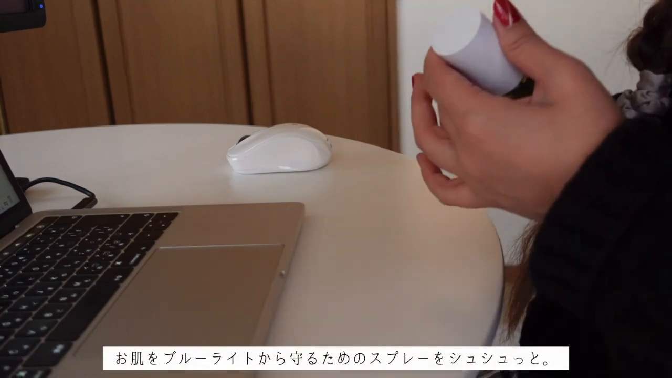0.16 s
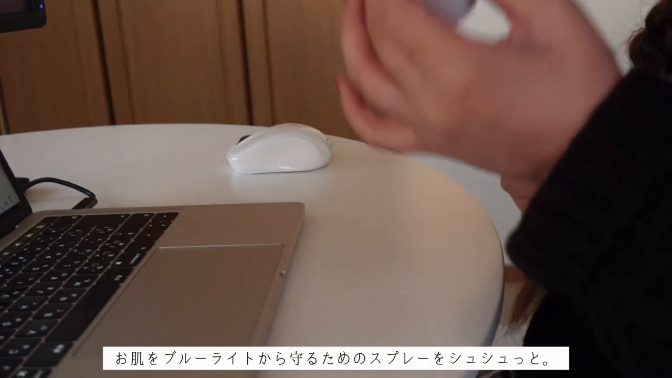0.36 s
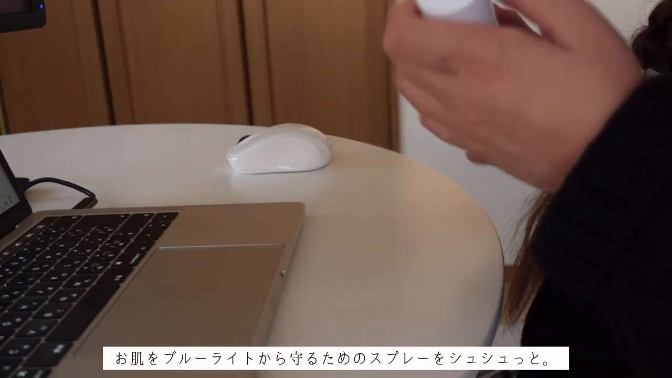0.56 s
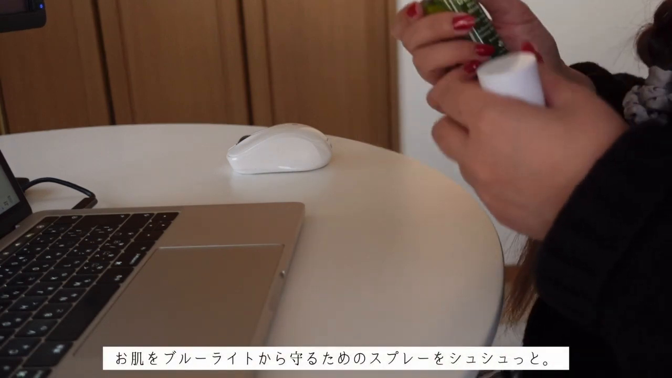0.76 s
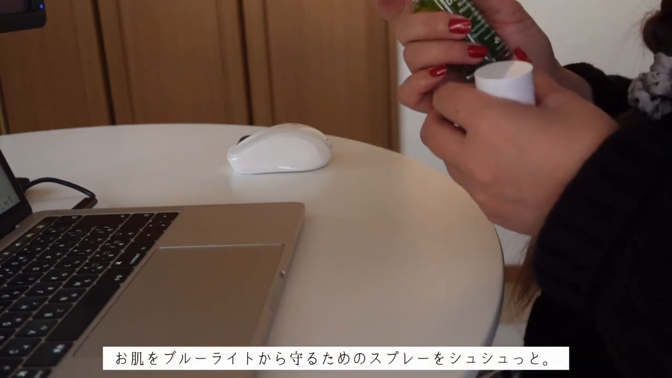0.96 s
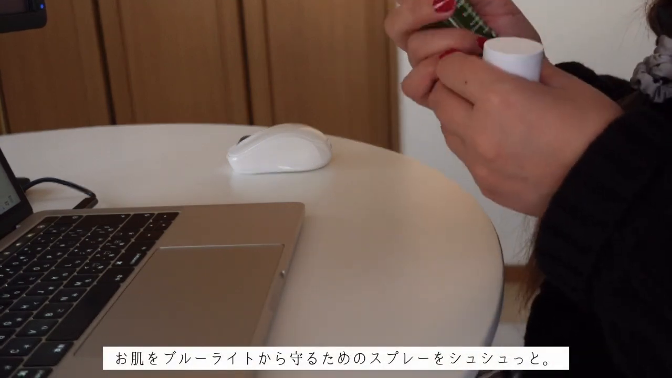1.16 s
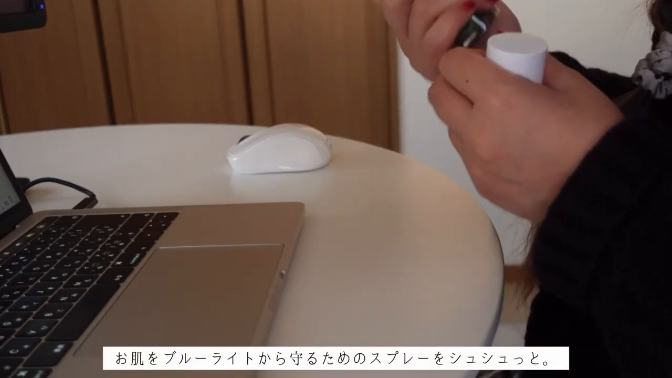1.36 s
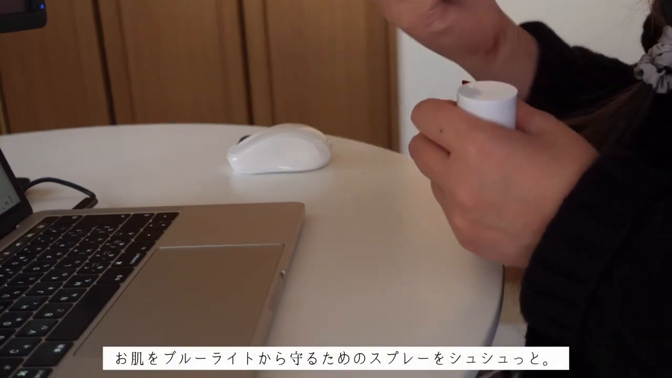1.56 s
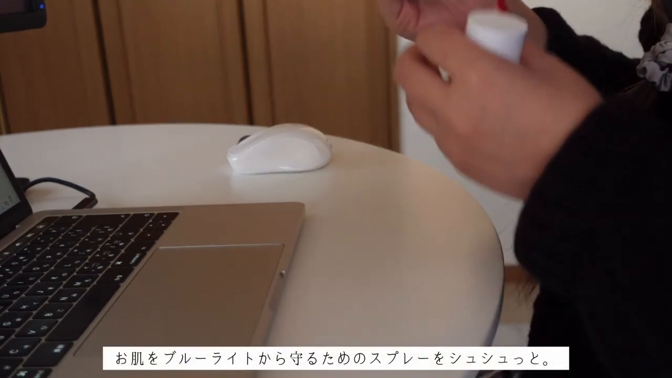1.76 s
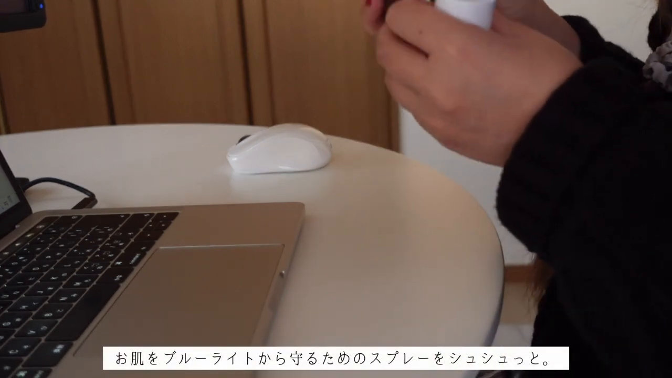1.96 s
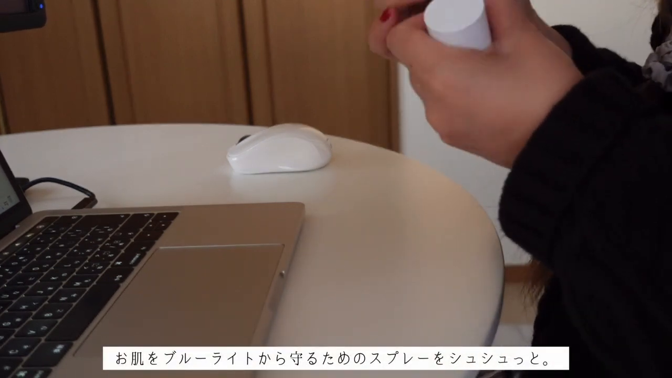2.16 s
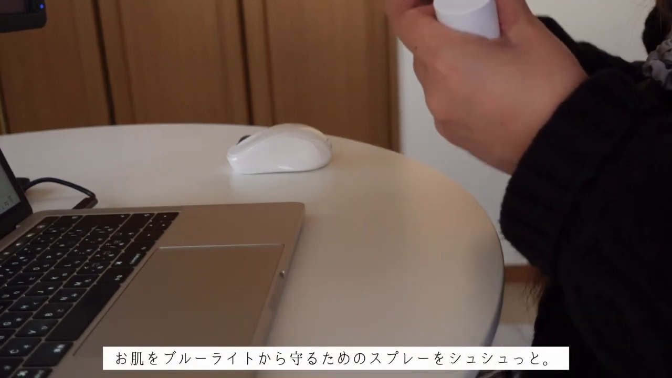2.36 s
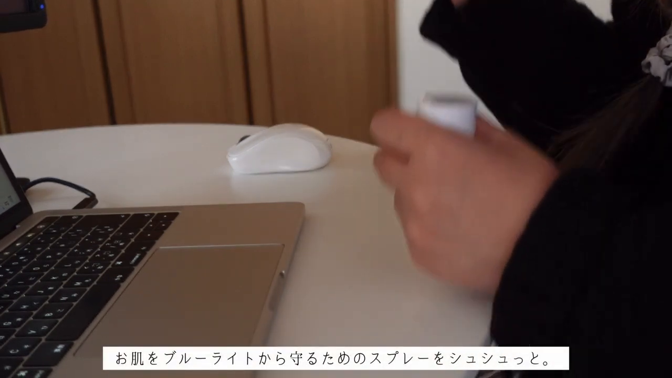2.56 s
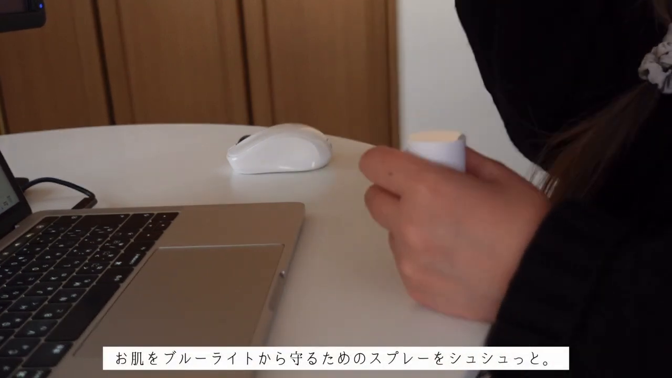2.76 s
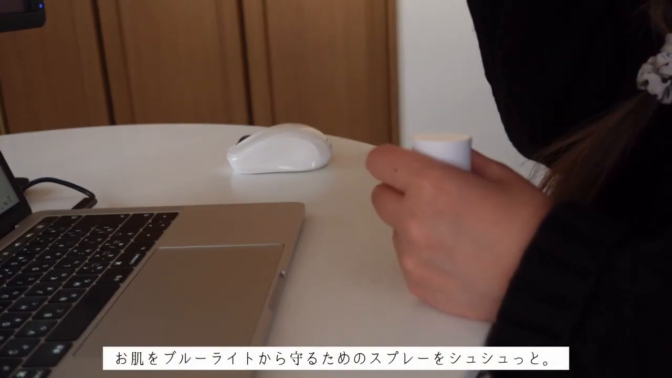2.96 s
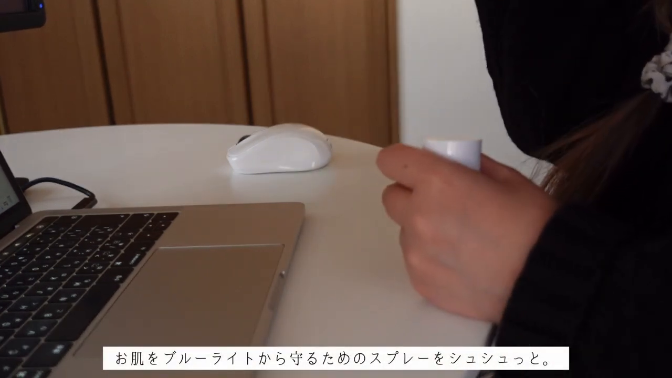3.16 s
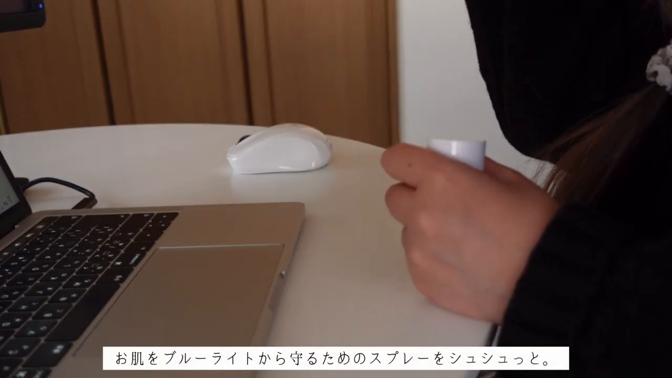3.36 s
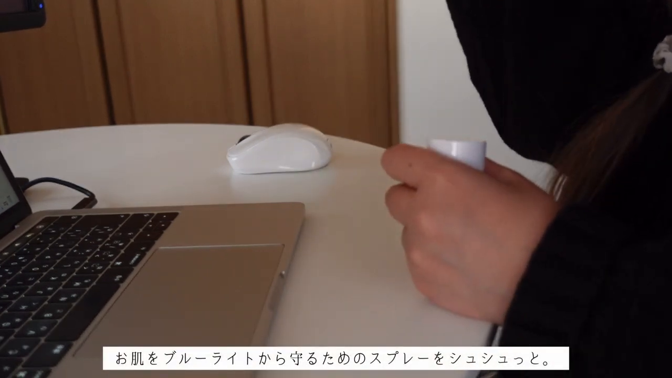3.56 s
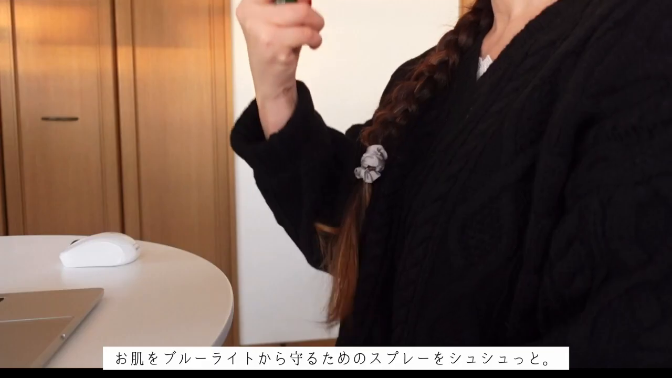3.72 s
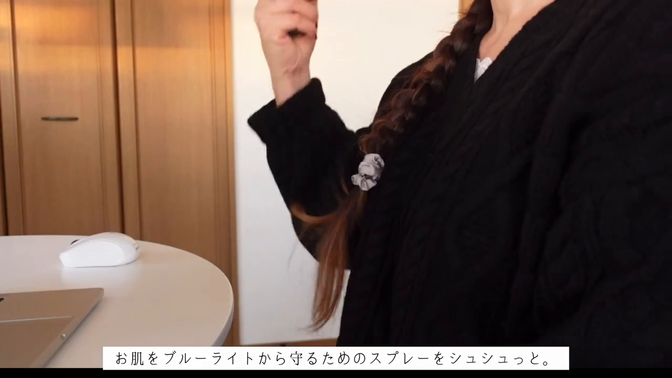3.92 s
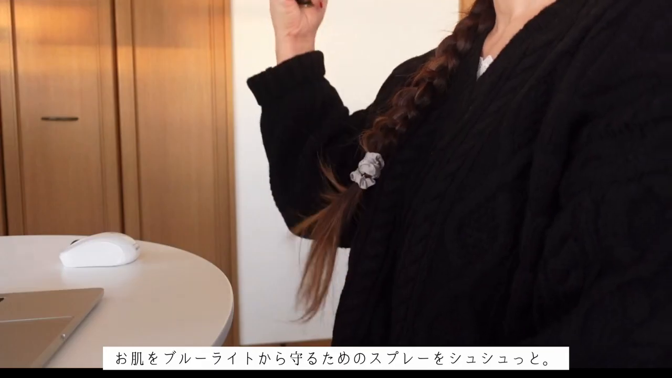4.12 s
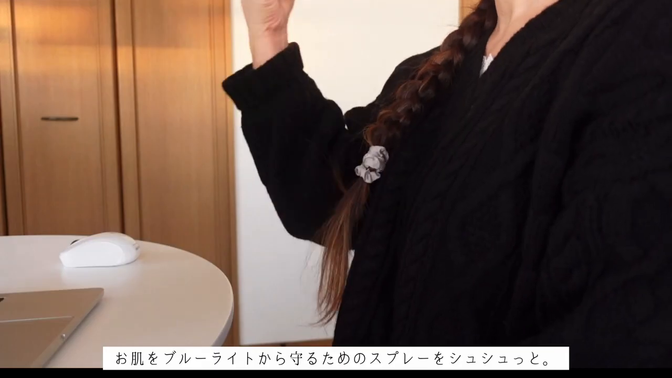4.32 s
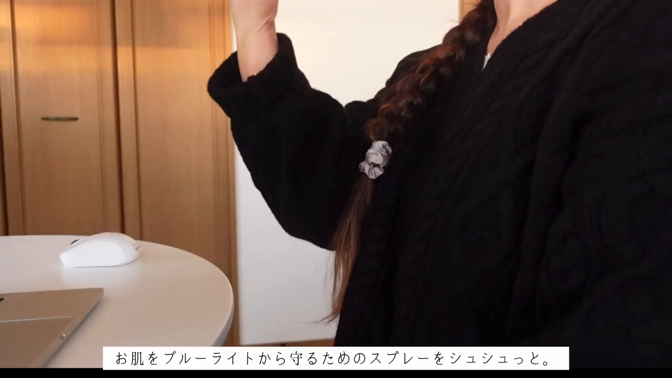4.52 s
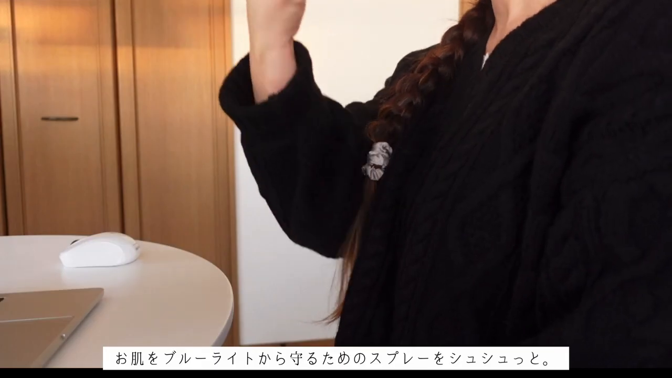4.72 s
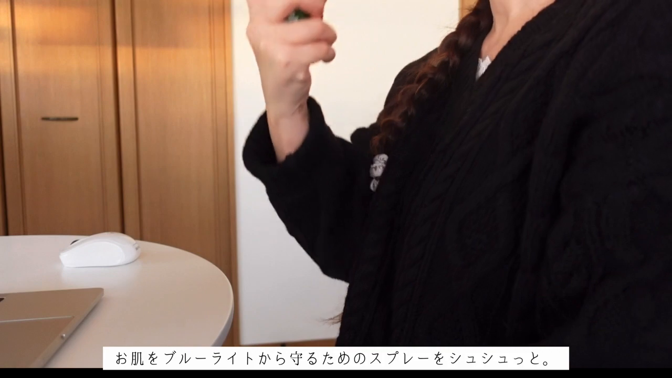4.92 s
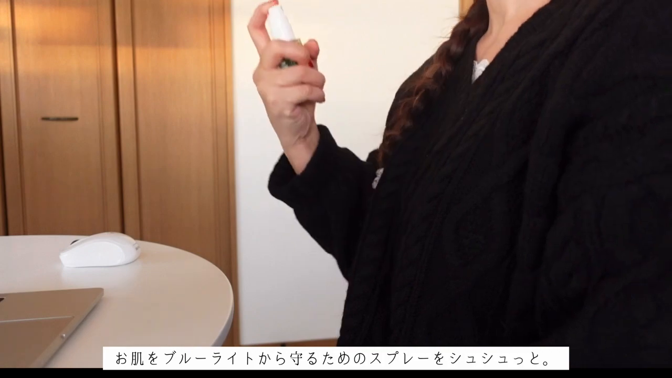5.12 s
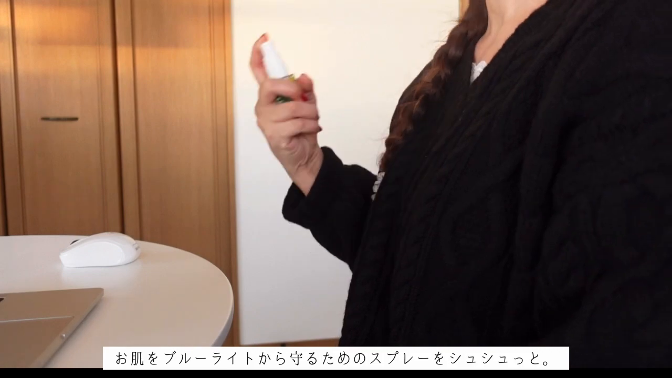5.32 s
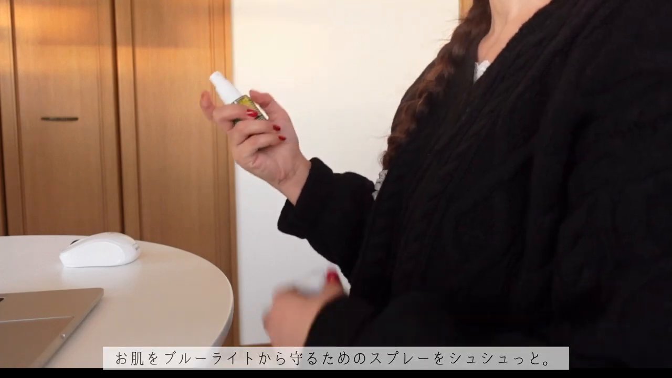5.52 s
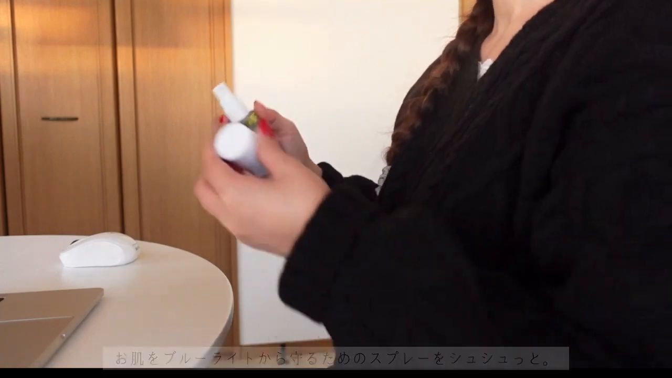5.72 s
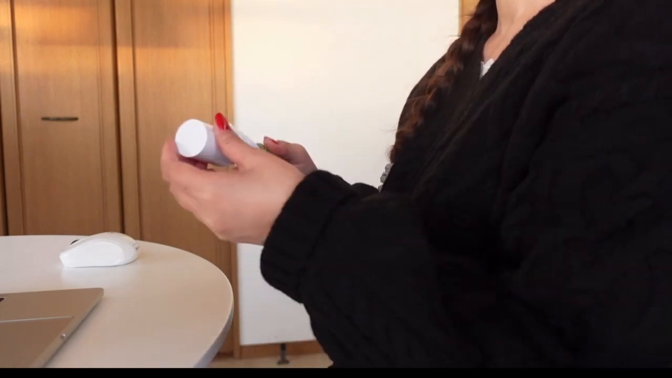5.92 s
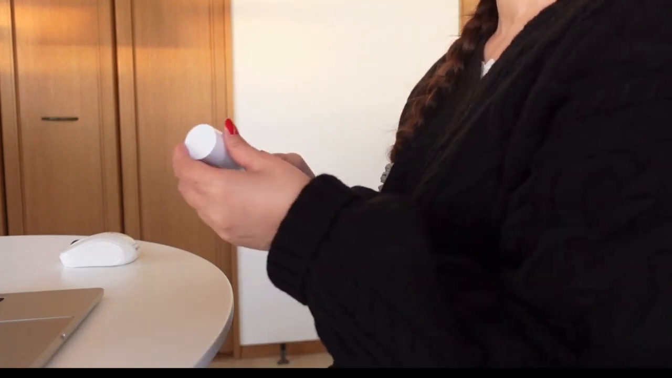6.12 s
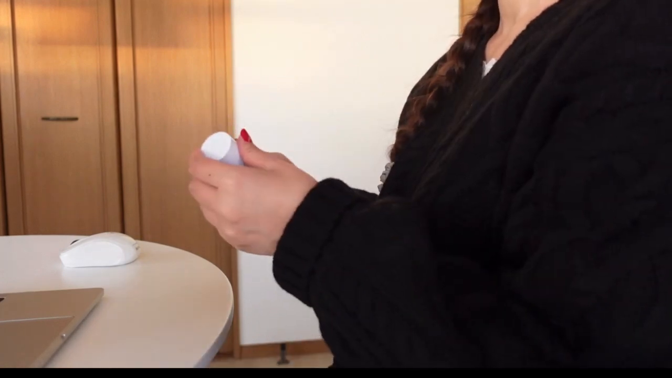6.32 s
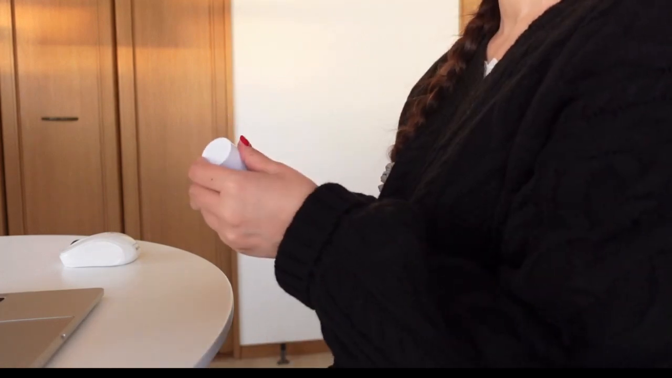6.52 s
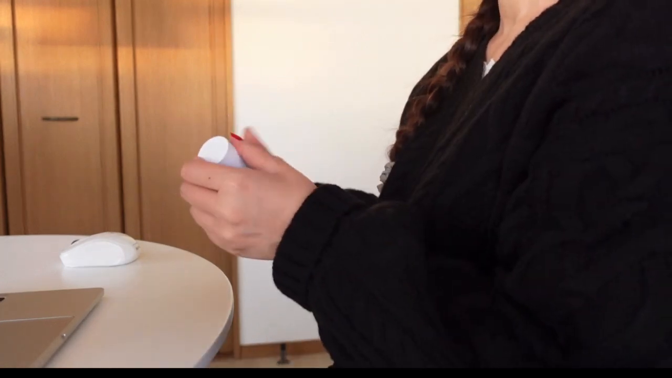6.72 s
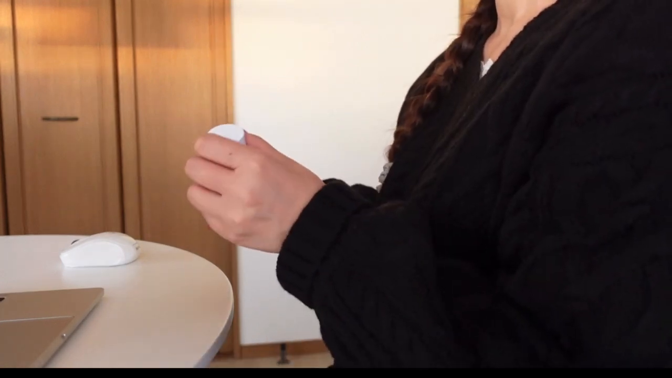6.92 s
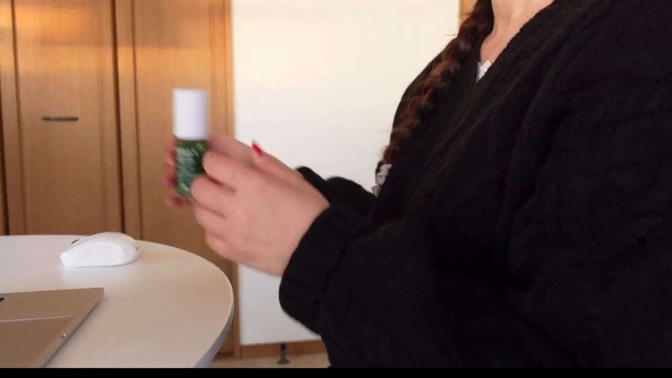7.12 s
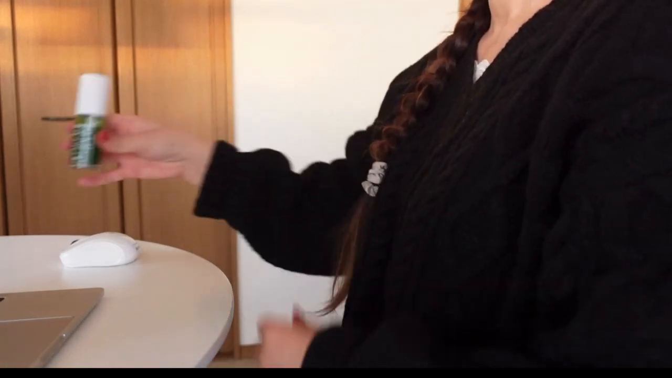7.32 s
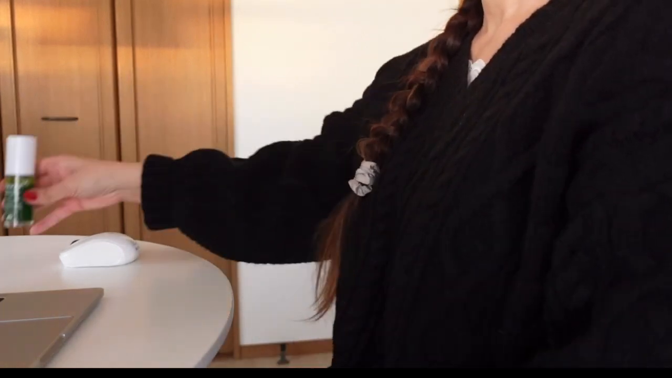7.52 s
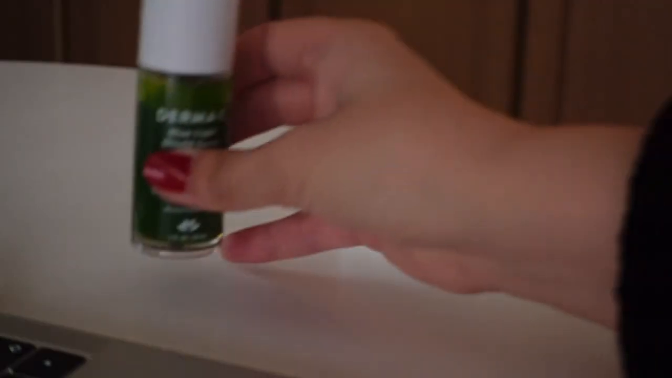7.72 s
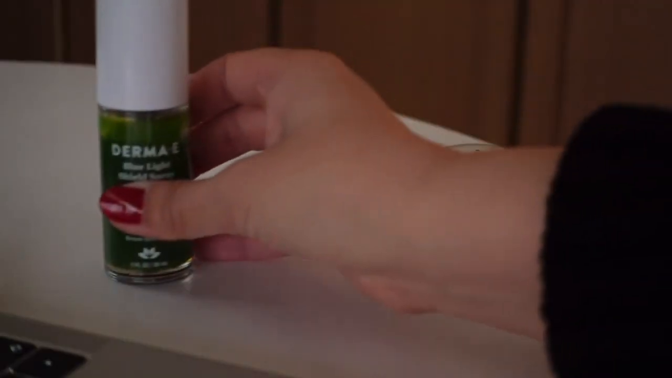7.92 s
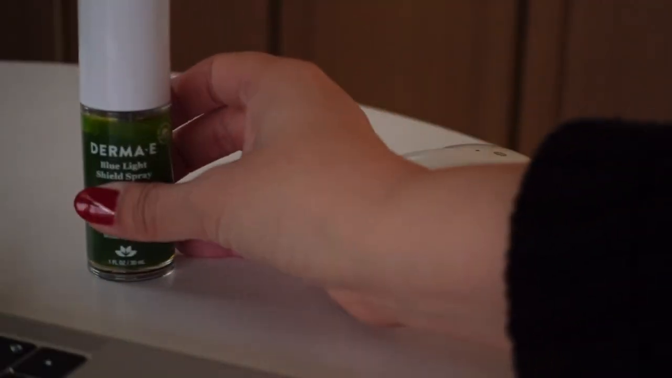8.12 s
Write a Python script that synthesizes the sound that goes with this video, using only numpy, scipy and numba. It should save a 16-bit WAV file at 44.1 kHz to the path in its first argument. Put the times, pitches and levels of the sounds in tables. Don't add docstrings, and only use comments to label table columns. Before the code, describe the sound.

Hands work a small glass spray bottle near the microphone. After a nail tick and a sharp double pop of the cap come soft taps and fabric rubs, two weak spritzes, a spitting one, then six crisp regular puffs with springy clicks. Cap contacts rattle, one hard snap rings off bare walls, and finally the bottle lands on wood with a short double knock over quiet room hum.

```python
import sys
import numpy as np
from scipy import signal
from scipy.fft import rfft, irfft, next_fast_len
from scipy.io import wavfile
from scipy.ndimage import uniform_filter1d, minimum_filter1d, map_coordinates
from numba import njit

SR = 44100
rng = np.random.default_rng(int(sys.argv[2]) if len(sys.argv) > 2 else 0)


def unload_audio(sound):
    columns = np.transpose(np.atleast_2d(sound))
    steps = np.round(np.clip(columns, -1, 1) * 32767)
    wavfile.write(sys.argv[1], SR, steps.astype(np.int16))


def invert_db(x):
    u = np.asarray(x, float) / 20
    return 10 ** u


N = 360738


def unit(x):
    return x / np.sqrt(np.mean(x ** 2) + 1e-20)


def along(points, hz):
    f, v = np.transpose(points)
    return np.interp(np.log(hz + 1), np.log(f + 1), v)


def wobble(rate):
    knots = rng.standard_normal(int(N * rate / SR) + 4)
    return map_coordinates(knots, [np.arange(N) * rate / SR])


def filtered(x, response):
    n = x.shape[-1]
    m = next_fast_len(n + SR // 4)
    return irfft(rfft(x, m) * response(np.fft.rfftfreq(m, 1 / SR)), m)[..., :n]


def resonances(modes):
    def response(f):
        total = 0
        for k, (centre, width, db) in enumerate(modes):
            resonator = 1j * f * width / (centre * centre - f * f + 1j * f * width)
            total = total + (-1) ** k * invert_db(db) * resonator
        return total
    return response


def noise(spectrum, alike):
    def mid_side(hz):
        turn = np.arccos(np.clip(along(alike, hz), -1, 1)) / 2
        return invert_db(along(spectrum, hz)) * [np.cos(turn), np.sin(turn)]
    mid, side = filtered(rng.standard_normal((2, N)), mid_side)
    return unit(np.array([mid + side, mid - side]))


def patchy(x, depth_db):
    z = signal.stft(x, nperseg=512)[2]
    field = rng.standard_normal(z.shape[1:])
    field = uniform_filter1d(uniform_filter1d(field, size=8, axis=0), size=12, axis=1)
    return signal.istft(z * invert_db(depth_db * unit(field)), nperseg=512)[1][:, :N]


def blow(s, db, scrape, modes):
    size, lead = 2 ** 13, SR // 100
    hz = np.fft.rfftfreq(size, 1 / SR)
    lag = np.abs(map_coordinates(rng.standard_normal(SR // 400), [hz / (SR / 160)]))
    turns = np.cumsum(lead / SR + scrape * lag) * SR / size
    sound = irfft(np.exp(-2j * np.pi * turns) * resonances(modes)(hz), size)
    touched = np.clip((np.arange(size) - lead) / (scrape * SR / 2) + 1, 0, 1)
    return np.pad(invert_db(db) * sound * touched, (round(s * SR) - lead, N))[:N]


def add(track, s, db, hz, t60, rough, attack=0.00011):
    t = np.arange(SR // 5) / SR
    phase = 2 * np.pi * hz * t + rough * np.cumsum(rng.standard_normal(len(t)))
    envelope = invert_db(db - 60 * t / t60) * (1 - np.exp(-t / attack))
    part = track[round(s * SR):][:len(t)]
    part += (envelope * np.sin(phase))[:len(part)]


# hz [Hz], t60_s [s]
ROOM_T60 = [(250, 0.54), (800, 0.45), (3000, 0.4), (6000, 0.35), (15000, 0.23)]


def room(x, wet_db, alike, gap, early_db, early=0.0054):
    hz, t, z = signal.stft(rng.standard_normal((2, SR // 2)), SR, nperseg=256)
    clumps_db = 2.35 * rng.standard_normal(len(t)) * np.exp(-t / 0.05)
    decay_db = 60 * t / along(ROOM_T60, hz)[:, None]
    level_db = clumps_db + early_db * np.exp(-t / early) - decay_db
    a, b = signal.istft(z * invert_db(level_db), SR, nperseg=256)[1]
    turn = np.arccos(np.clip(alike, -1, 1)) / 2
    mid, side = np.cos(turn) * a, np.sin(turn) * b
    tail = np.array([mid + side, mid - side]) / np.linalg.norm(a)
    tail = np.pad(tail, ((0, 0), (round(gap * SR), 0)))
    x = np.atleast_2d(x)
    sounding = np.flatnonzero(np.abs(x[0]) > 1e-9)
    first, last = sounding[0], sounding[-1]
    echoes = signal.fftconvolve(x[:, first:last], tail, axes=1)
    return x + invert_db(wet_db) * np.pad(echoes, ((0, 0), (first, N)))[:, :N]


# start_s [s], hands_left_minus_right_db [dB], whine_db [dB], drone_db [dB]
SHOTS = [
    (0, -1.2, -66.5, -63),
    (3.69, 0.5, -90, -62.5),
    (7.6, 1, -62.5, -73),
]


def shot(column):
    rows = np.array(SHOTS)
    current = np.searchsorted(rows[1:, 0], np.arange(N) / SR)
    return uniform_filter1d(rows[current, column], size=400)


# hz [Hz], density_db [dB per Hz]
HUM = [(82, -62), (140, -30), (161, -20.5), (221, -19), (342, -8.5), (632, -2), (2200, -6.5), (2580, -10),
       (3550, -10.5), (4590, -15), (15100, -23), (16000, -33)]
# hz [Hz], likeness [0 to 1]
HUM_ALIKE = [(60, 0.86), (150, 0.78), (380, 0.38), (950, 0.28), (2380, 0.027), (5980, 0.15), (15000, 0.68)]
# hz [Hz], density_db [dB per Hz]
RUMBLE = [(12, -44), (20, -14), (54, -17), (75, -4), (108, -1), (140, -11), (180, -30), (310, -120)]


def hum():
    bed = invert_db(-51.5 + 0.22 * wobble(1.82) + 0.17 * wobble(3.8)) * noise(HUM, HUM_ALIKE)
    bed = bed + invert_db(-96.5) * noise(RUMBLE, HUM_ALIKE)
    whine_hz, drone_hz, lean_db = 2325, 614, -0.9
    cycles = np.cumsum(whine_hz + 1.15 * wobble(1.3)) / SR
    whine = invert_db(shot(column=2) + 0.92 * wobble(4)) * np.sin(2 * np.pi * cycles + [[0], [.6]])
    fuzz = unit(filtered(rng.standard_normal((2, N)), resonances([(drone_hz, 70, 0)])))
    drone = invert_db(shot(column=3) + 1.5 * wobble(2.13)) * fuzz
    return (bed + whine + drone) * invert_db([[lean_db / 2], [-lean_db / 2]])


def swells(peaks, rise, fall):
    t = np.arange(N) / SR
    gain = 0
    for s, db, up, down in zip(*np.broadcast_arrays(*np.transpose(peaks), rise, fall)):
        gain = gain + invert_db(db - 21.5 * np.maximum((s - t) / up, (t - s) / down))
    return gain


# peak_s [s], swell_s [s], fade_s [s], weave_db [dB], folds_db [dB]
RUBS = [(1.436, .06, 0.15, -57, -65), (1.736, .12, .1, -63, -75), (1.894, .15, .25, -65, -72),
        (2.12, .15, .06, -52.5, -64), (2.23, .08, 0.14, -64, -71), (2.396, 0.1, 0.063, -51, -55.5),
        (2.54, .25, .05, -63.5, -72), (5.45, 0.034, 0.17, -72, -49.5), (5.634, .1, 0.08, -72, -62),
        (5.714, 0.036, 0.026, -63, -57), (6.85, .05, .1, -61, -60), (6.936, .02, .14, -62, -64)]
# hz [Hz], level_db [dB]
WEAVE = [(4000, -19), (6500, 0.5), (10000, 2), (16000, -4)]
# hz [Hz], level_db [dB]
FOLDS = [(1800, -26), (2800, 7), (4000, -2), (6000, -14.5)]
# peak_s [s], level_db [dB]
SLEEVE = [(5.156, -66), (5.318, -65), (5.44, -69), (5.526, -69), (5.798, -66.5), (5.99, -70)]
# hz [Hz], level_db [dB]
WOOL = [(110, -30), (160, -4.5), (280, 2), (420, -22)]


def rustle():
    s, rise, fall, weave_db, folds_db = np.transpose(RUBS)
    fine = unit(invert_db(2.3 * wobble(340)) * noise(WEAVE, [(5000, 0.85)]))
    coarse = unit(invert_db(1.7 * wobble(200)) * noise(FOLDS, [(3000, .6)]))
    wool = swells(SLEEVE, 0.15, 0.15) * noise(WOOL, [(200, 0.9)])
    fine = swells(np.c_[s, weave_db], rise, fall) * fine
    coarse = swells(np.c_[s, folds_db], rise, fall) * coarse
    return fine + coarse + wool


# hz [Hz], density_db [dB per Hz]
CREAK = [(500, -60), (1500, -15.5), (2200, 1), (2800, -3), (4200, -10), (6000, -40)]


def creak():
    t = np.arange(N) / SR
    working = uniform_filter1d(1.0 * ((t > 3.46) & (t < 5.28)), size=2000)
    return invert_db(-59) * working * unit(invert_db(5.6 * wobble(160)) * noise(CREAK, [(2000, .8)]))


# start_s [s], peak_db [dB], pitch_hz [Hz], width_hz [Hz]
NAILS = [(.0925, -29, 5760, 3000), (2.345, -34, 4500, 3000), (2.4074, -33.5, 5000, 4000),
         (5.716, -44, 3500, 3000), (6.715, -36, 7500, 3000), (6.938, -34, 5000, 2500)]


def nails():
    ticks = 0
    for s, db, hz, width in NAILS:
        ticks = ticks + blow(s, db + 13, 0.00043, [(hz, width, .1), (1.9 * hz, width, -5)])
    return ticks


# start_s [s], level_db [dB], pitch_hz [Hz],
# t60_s [s]
HOLLOW = [(1.201, -43.5, 730, 0.025), (1.206, -36, 614, 0.042), (1.256, -42, 630, 0.04),
          (1.769, -47, 540, 0.037), (6.289, -24, 1234, 0.06), (6.3288, -15.5, 1035, 0.026),
          (7.966, -30, 223.6, 0.15)]


def knocks():
    x = np.zeros(N)
    for s, db, hz, t60 in HOLLOW:
        add(x, s, db, hz, t60, rough=0.011, attack=0.00053)
    return x


# start_s [s], level_db [dB], contact_s [s]
SET_DOWN = [
    (7.9608, 20, 0.00032),
    (7.974, 10.5, 0.00039),
]
# hz [Hz], width_hz [Hz], level_db [dB]
TABLE = [(227, 30, -12), (441, 50, 6), (598, 66, 4), (799, 57, 4.5), (1030, 157, 2), (1720, 310, -4.5),
         (2550, 670, -15), (3400, 400, -12), (4500, 910, -22.5), (6600, 1300, -28), (13400, 1300, -42)]


def table():
    return sum(blow(*touch, TABLE) for touch in SET_DOWN)


# hz [Hz], width_hz [Hz], level_db [dB]
LOOSE_RINGS = [(527, 490, -7), (1800, 430, -5), (3300, 1100, -10.5), (5050, 350, 3.5), (8450, 5700, -10),
               (14500, 2100, -20)]
# hz [Hz], width_hz [Hz], level_db [dB]
FREE_RINGS = [(1166, 105, -0.5), (1800, 1300, -9), (3350, 200, 0), (5500, 300, -6), (7200, 2000, -16),
              (11000, 3700, -16)]


def cap_pops():
    return blow(.2843, 11.1, 0.00122, LOOSE_RINGS) + blow(.2971, 12, 0.00048, FREE_RINGS)


# start_s [s], wall_peak_db [dB], wall_hz [Hz], hollow_re_wall_db [dB], hardness_db [dB]
CAP = [(5.9993, -8.5, 2640, -29, -13.5), (6.0338, -17, 2620, -20, -28), (6.193, -22.5, 2700, -17, -16),
       (6.212, -22.5, 2560, -31, 0), (6.2199, -23.5, 2550, -13, -12), (6.2305, -32, 2900, -12, -4),
       (6.238, -33, 2900, -12, -4), (6.257, -18, 3100, -3, 6), (6.2613, -11.5, 2610, -3, -13),
       (6.3285, -23, 2620, -8, 1), (6.355, -22.5, 3450, -4, 6)]


def cap():
    x = np.zeros(N)
    for s, db, wall_hz, hollow_db, rim_db in CAP:
        crack_db = 1.66 * rim_db
        air = [(1270, 110, hollow_db + 5.5), (1900, 600, hollow_db / 2 - 8.5)]
        wall = [(wall_hz, 170, 0.1), (1.224 * wall_hz, 600, -9)]
        rim = [(4100, 900, rim_db / 2 - 10), (5600, 800, rim_db - 9)]
        crack = [(7700, 1200, crack_db - 16.5), (11500, 5000, crack_db - 23.5)]
        x += blow(s - 0.0001, db + 28, 0.00059, air + wall + rim + crack)
    return x


# hz [Hz], width_hz [Hz], level_db [dB]
HOME_RINGS = [(860, 310, -14), (1290, 210, -6.5), (2100, 450, -9), (3000, 330, -2.5), (3430, 160, 2.5),
              (4300, 320, -6), (5400, 380, -2), (7450, 1100, -14), (9700, 2300, -16.5), (14000, 3900, -29)]


def cap_snaps():
    return blow(6.5303, 27.6, .0011, HOME_RINGS)


# start_s [s], peak_db [dB]
PRIMING = [(3.1795, -41), (3.3692, -38.5), (3.419, -35), (3.467, -22.5), (3.5808, -35), (3.629, -39),
           (3.653, -37), (3.699, -35), (3.7658, -37)]
# start_s [s], peak_db [dB]
RETURNS = [(3.9469, -27.5), (4.2123, -27), (4.4614, -30), (4.7212, -23.5), (4.9607, -26), (5.2094, -24.5)]


def pump():
    ticks = [(s, db, 2080) for s, db in PRIMING] + [(s, db, 2260) for s, db in RETURNS]
    primed = RETURNS[0][0]
    for s, *_ in STROKES:
        if s > primed:
            ticks.append((s - .017, -39.5 + 7 * (s - primed), 2390))
    x = np.zeros(N)
    for s, db, hz in ticks:
        rings = [(hz, 270, .1), (1.21 * hz, 550, -9.5), (5000, 3000, -27)]
        x += blow(s + 0.00035, db + 28.5, 0.00027, rings)
    return x


# start_s [s], peak_db [dB], pitch_hz [Hz], bore_re_peak_db [dB]
SPITS = [(3.609, -29, 13500, -14), (3.6142, -13.5, 14000, -9), (3.6445, -30, 9500, -13),
         (3.6495, -32, 14500, -12), (3.6572, -17, 14000, -12), (3.6625, -19.5, 12700, -9.5),
         (3.6712, -21, 11400, -17)]


def spits():
    x = np.zeros(N)
    for s, db, hz, bore_db in SPITS:
        rings = [(4500, 2500, bore_db - 2.5), (7000, 350, bore_db + 7), (9800, 2000, -8), (hz, 1800, .1)]
        x += blow(s + .0003, db + 14.5, 0.00122, rings)
    return x


# valve_opens_s [s], open_s [s], jet_db [dB], end_pressure_loss_db [dB]
STROKES = [(3.184, 0.063, -34, 1.2), (3.25, .065, -39.5, 7), (3.464, 0.16, -32.5, 17),
           (3.64, 0.072, -46, 4), (3.79, 0.13, -30.5, 4), (4.06, 0.12, -32, 2.5), (4.314, 0.12, -31.5, 3),
           (4.572, 0.11, -30, 1.5), (4.811, 0.12, -29, 5.5), (5.073, 0.11, -31.5, 3.5)]
# hz [Hz], density_db [dB per Hz]
JET = [(530, -53), (900, -37), (1090, -9.5), (1270, -14), (1690, -7.5), (2830, -3.5), (4020, -2), (6540, 1),
       (12900, 2), (15700, -1), (16500, -66)]


def spray():
    pressure, t = np.zeros(N), np.arange(SR // 2) / SR
    for s, length, db, sag_db in STROKES:
        build_db = 7.5 * np.exp(-t / 0.026)
        loss_db = sag_db * np.minimum(t / length, 1) ** 2.05
        shut_db = 453 * np.maximum(t - length, 0)
        pressure[round(s * SR):][:len(t)] += invert_db(db - build_db - loss_db - shut_db)
    droplets = invert_db(0.9 * wobble(900) + 1.3 * wobble(55))
    hiss = patchy(noise(JET, [(1000, 1.0), (3000, 0.96)]), depth_db=1.6)
    return pressure * unit(droplets * hiss)


def scene():
    handling = room(cap(), wet_db=-0.5, alike=0.77, gap=0.0037, early_db=6.5)
    handling += room(knocks(), wet_db=-2.5, alike=0.9, gap=0.00393, early_db=4)
    handling += room(cap_pops(), wet_db=-3.5, alike=0.76, gap=0.0044, early_db=2.0)
    handling += room(cap_snaps(), wet_db=6.5, alike=0.81, gap=0.0065, early_db=-2.5, early=0.017)
    handling += room(pump(), wet_db=-2.5, alike=0.81, gap=0.0033, early_db=5)
    handling += room(spits() + nails(), wet_db=-4.5, alike=0.4, gap=0.0034, early_db=10)
    handling += room(table(), wet_db=-0.5, alike=0.91, gap=.003, early_db=-2.5)
    handling = filtered(handling, lambda hz: (1j * hz / (200 + 1j * hz)) ** 4)
    jet = room(spray(), wet_db=-8.5, alike=0.74, gap=.004, early_db=-9.0)
    lean_db = shot(column=1)
    return (handling + jet + rustle() + creak()) * invert_db([lean_db / 2, -lean_db / 2]) + hum()


@njit
def recover(needed, step):
    gain = needed.copy()
    for i in range(1, len(gain)):
        gain[i] = min(needed[i], gain[i - 1] + step * (1 - gain[i - 1]))
    return gain


def band_limit(x):
    return signal.sosfilt(signal.butter(12, 16990, fs=SR, output="sos"), x)


def record(dry):
    peak = np.abs(dry).max(0) + 1e-9
    needed = minimum_filter1d(np.minimum(1, 0.42 / peak), size=45)
    gain = uniform_filter1d(recover(needed, 1 / (0.077 * SR)), size=22)
    mix = filtered(dry * gain, lambda hz: hz < 16400)
    return band_limit(mix)


dry = scene()
out = record(dry)
unload_audio(out)
```